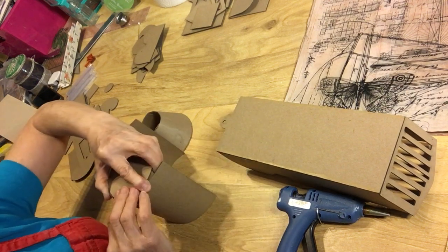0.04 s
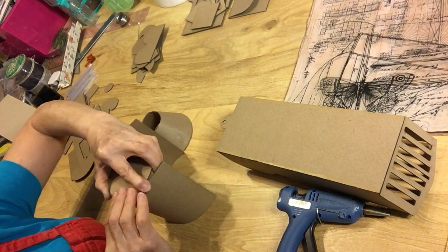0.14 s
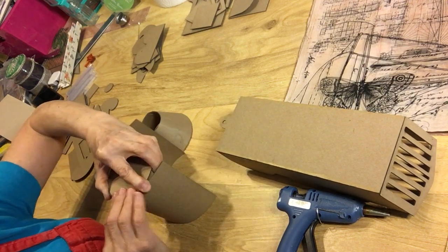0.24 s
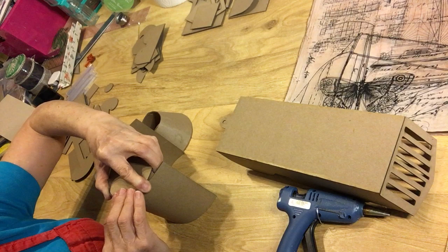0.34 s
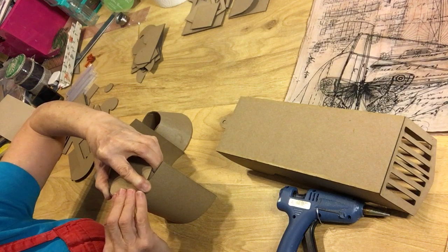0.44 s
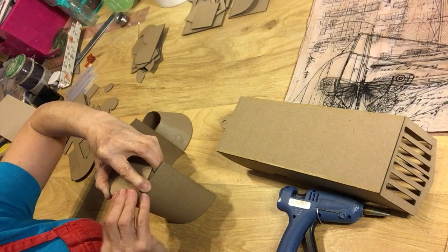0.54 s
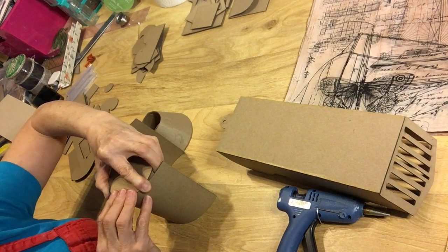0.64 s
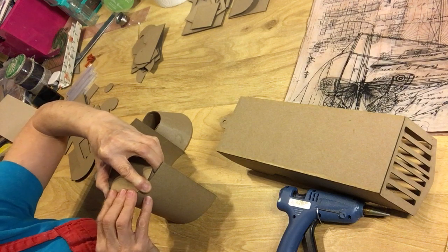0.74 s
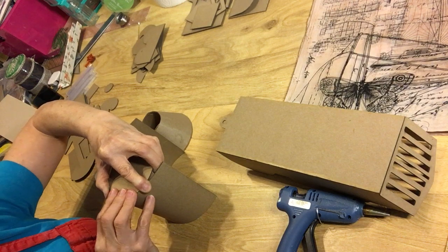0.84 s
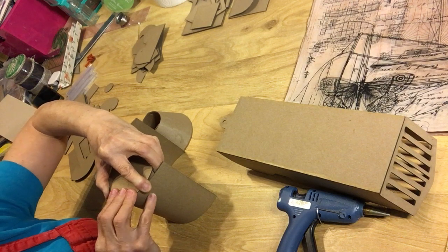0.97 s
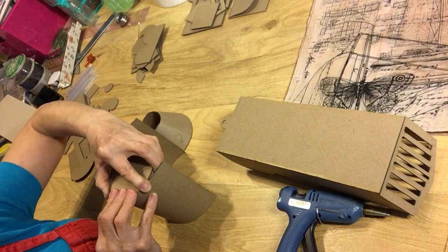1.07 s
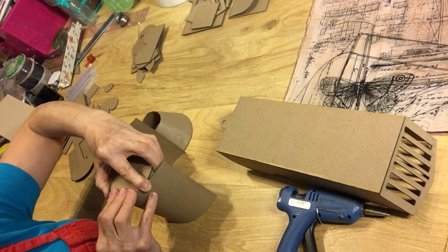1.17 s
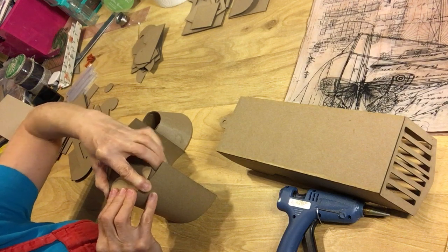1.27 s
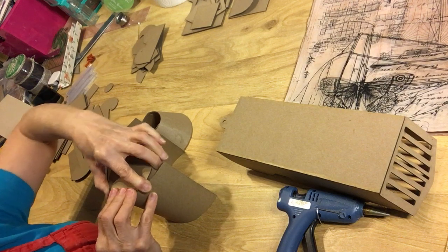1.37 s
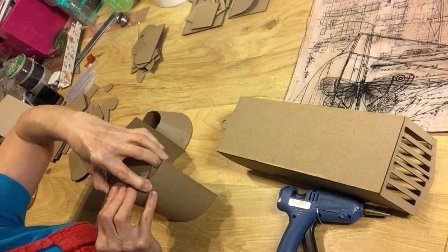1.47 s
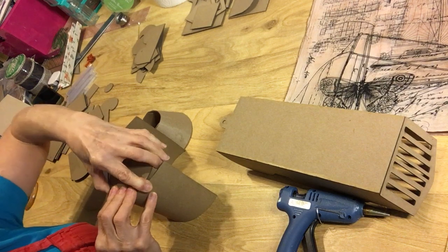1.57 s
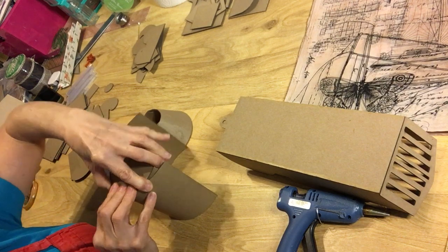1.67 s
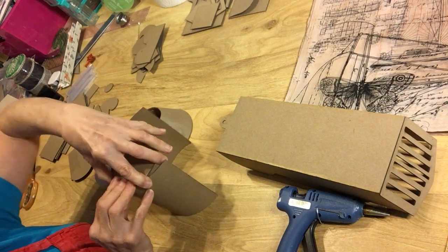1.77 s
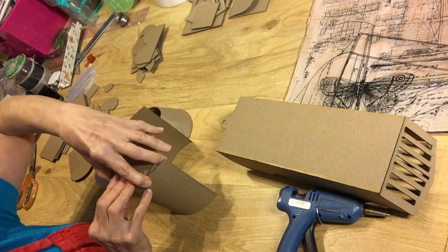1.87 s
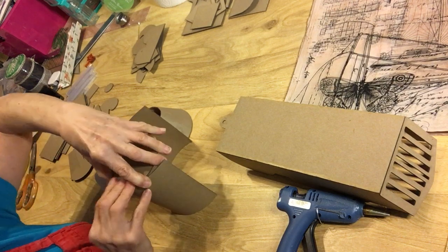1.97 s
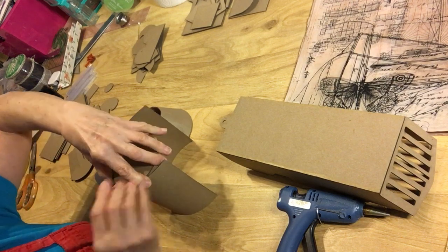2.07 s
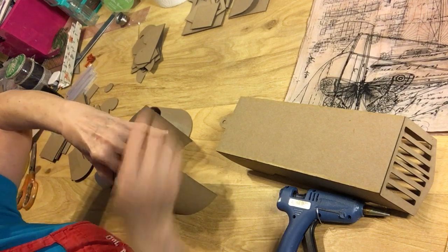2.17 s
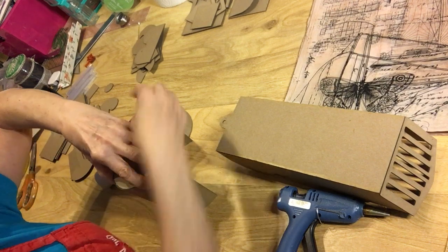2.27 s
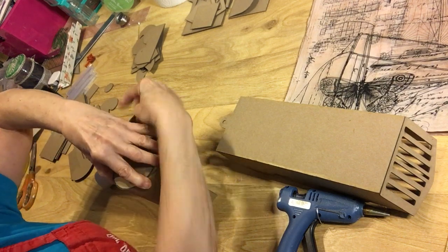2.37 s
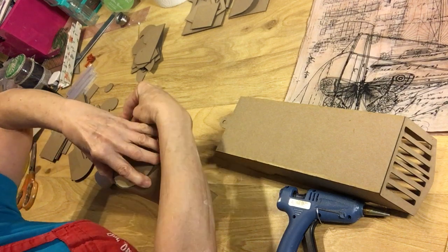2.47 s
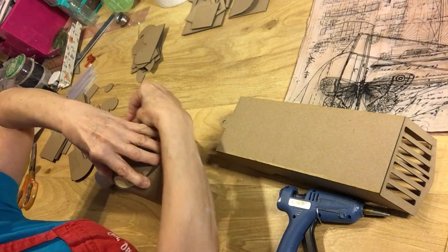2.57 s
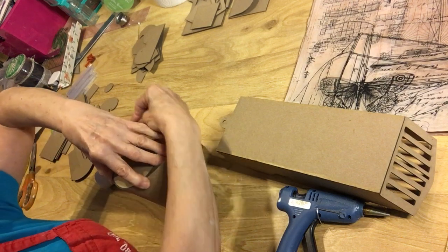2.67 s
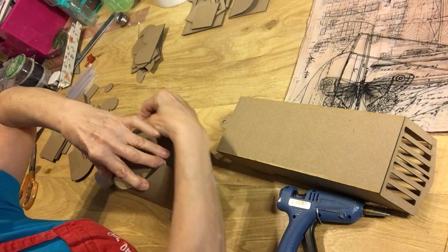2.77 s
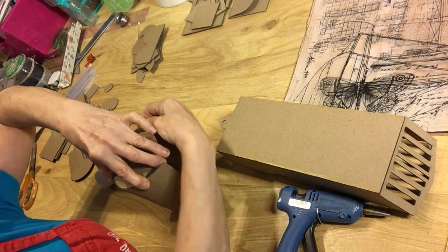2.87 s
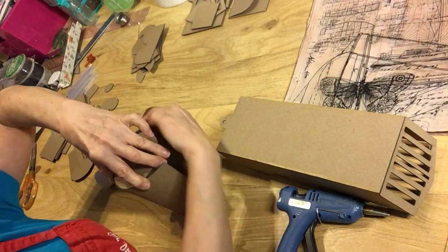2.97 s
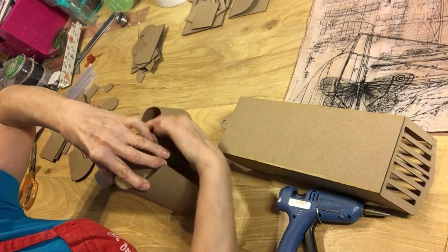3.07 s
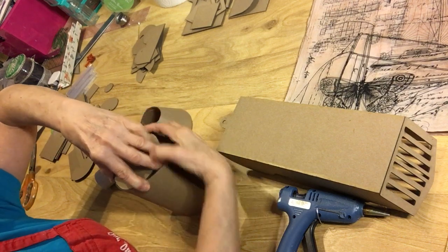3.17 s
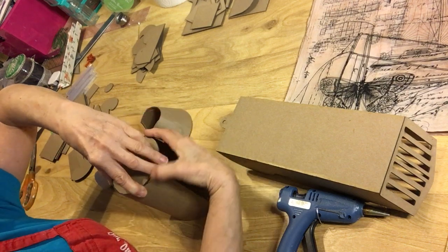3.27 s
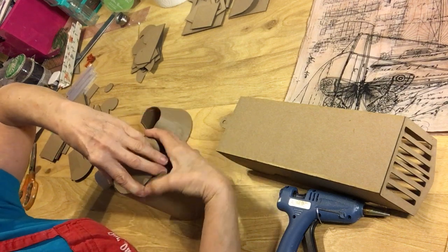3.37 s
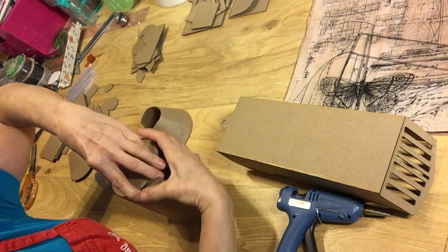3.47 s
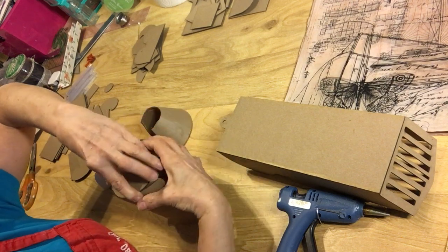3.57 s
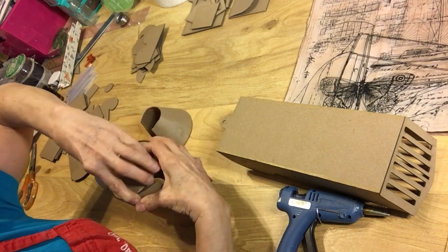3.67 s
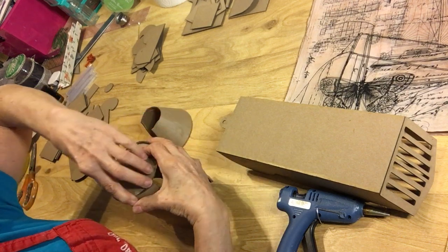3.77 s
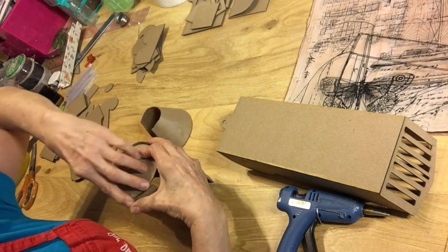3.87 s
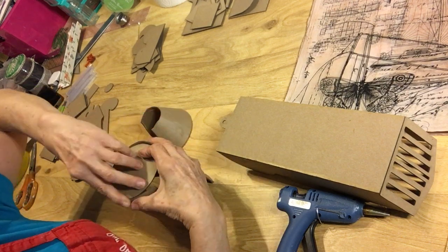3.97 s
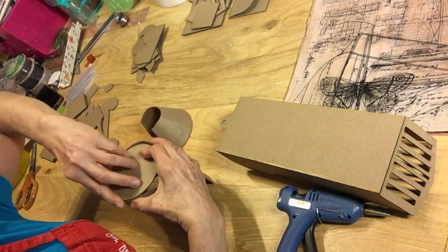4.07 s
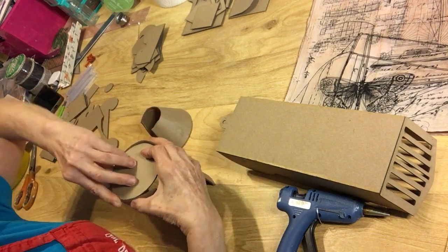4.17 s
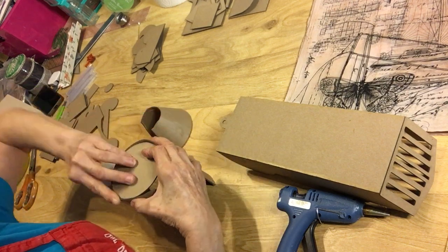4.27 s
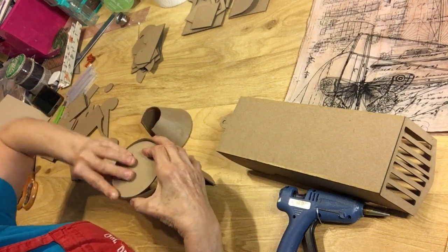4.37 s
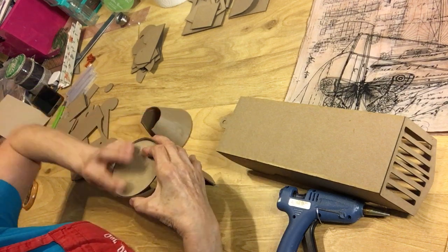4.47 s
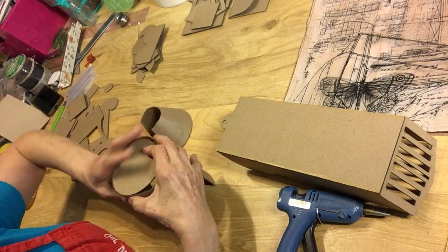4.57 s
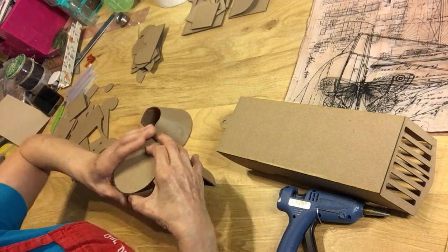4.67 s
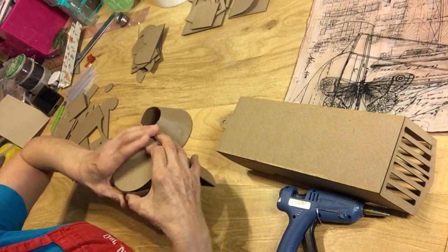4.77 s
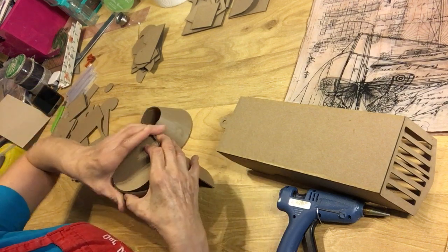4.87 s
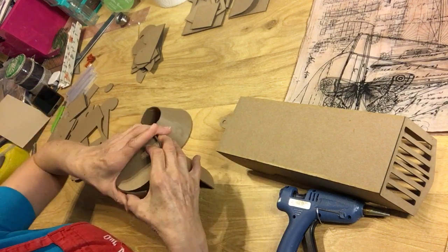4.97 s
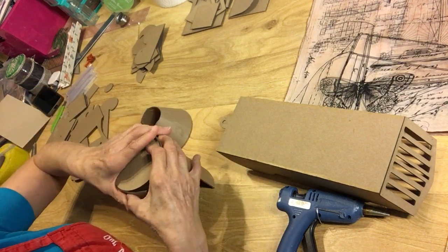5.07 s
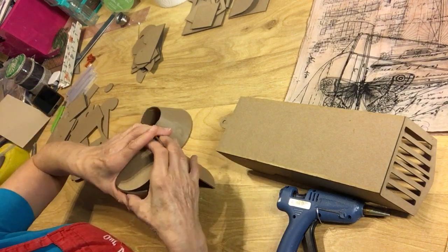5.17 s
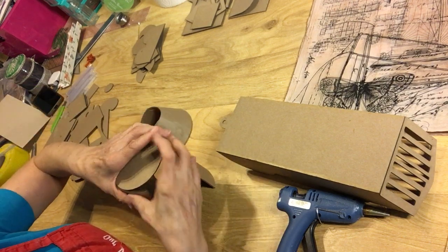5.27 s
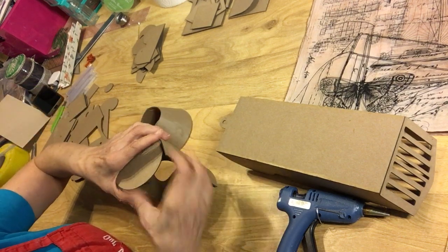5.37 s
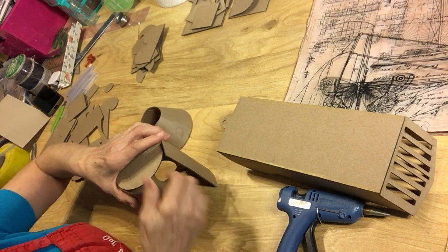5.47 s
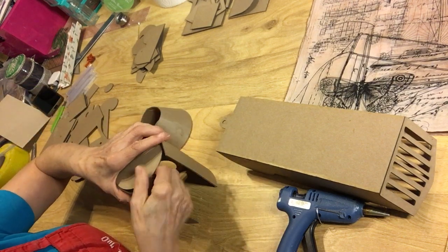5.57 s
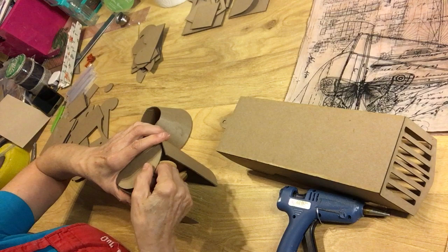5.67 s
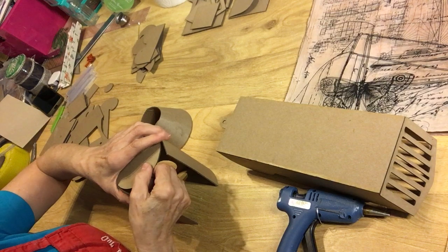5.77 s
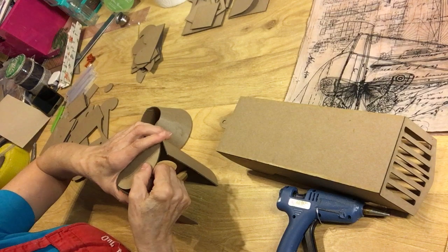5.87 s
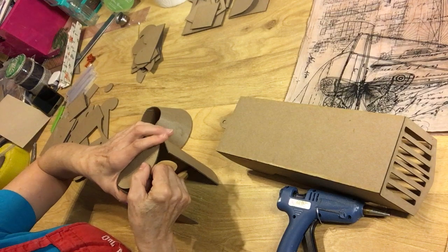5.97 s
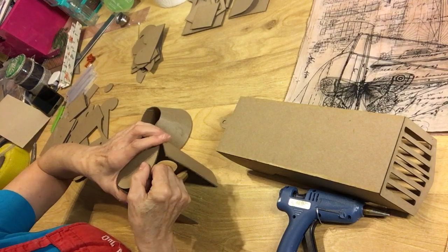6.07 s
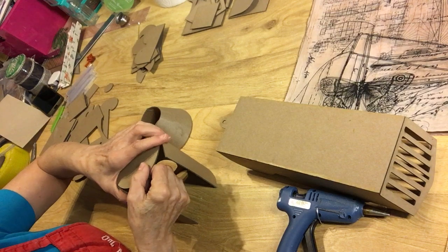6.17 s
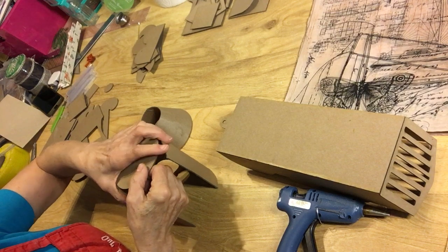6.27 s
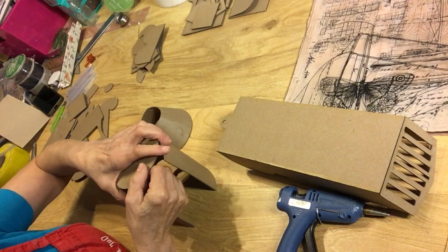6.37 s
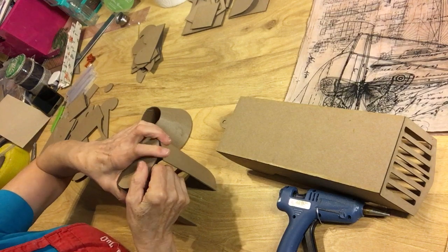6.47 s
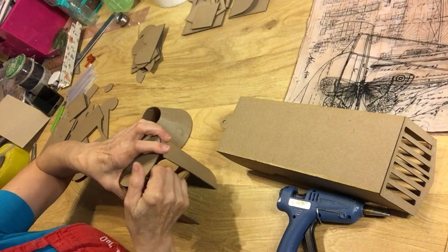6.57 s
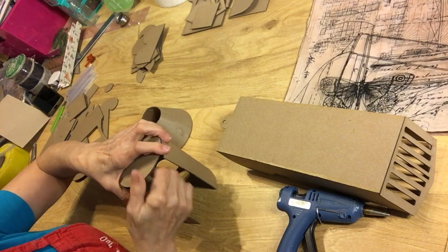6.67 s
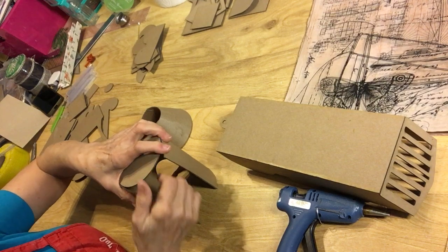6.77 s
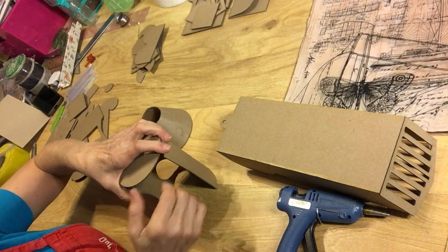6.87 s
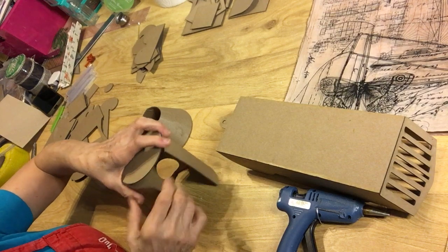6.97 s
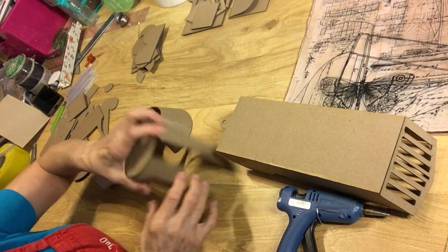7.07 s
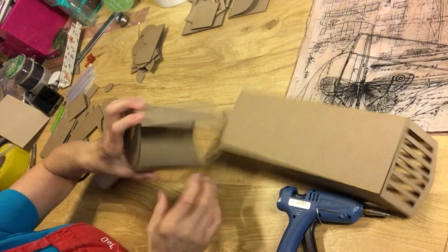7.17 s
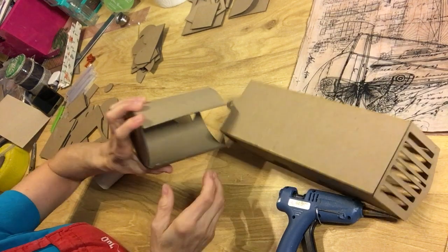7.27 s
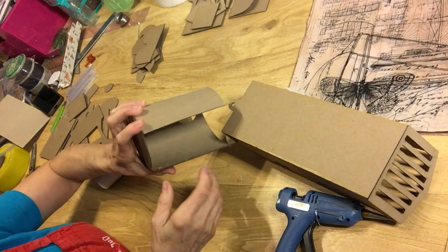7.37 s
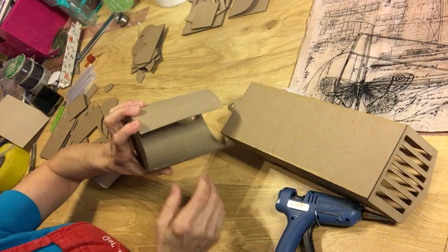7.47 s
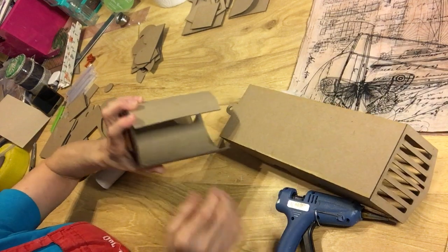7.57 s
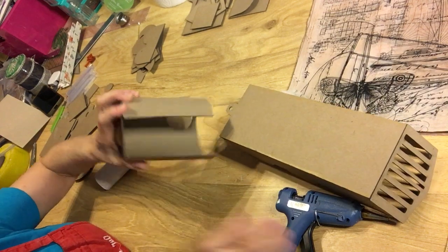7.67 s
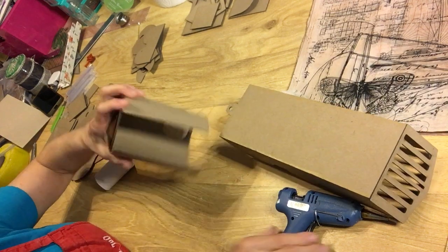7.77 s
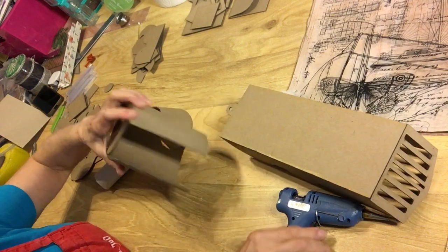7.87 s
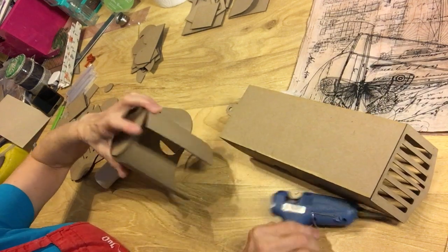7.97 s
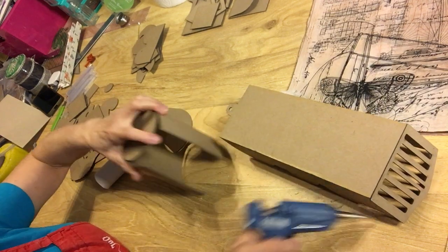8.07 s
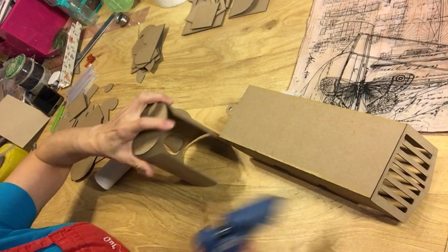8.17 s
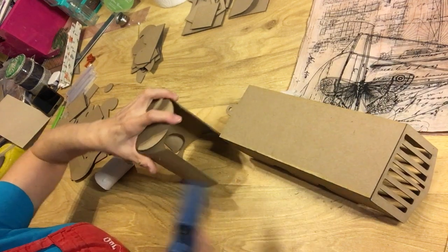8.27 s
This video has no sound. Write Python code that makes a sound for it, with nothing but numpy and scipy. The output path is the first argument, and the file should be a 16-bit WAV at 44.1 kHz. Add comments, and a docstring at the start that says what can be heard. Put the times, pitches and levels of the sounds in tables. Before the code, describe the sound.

Faint cardboard rustles, ticks and finger bumps in a small humming room, ending with louder knocks against a hollow box.

```python
"""Hands press a cardboard disc into a rolled cardboard tube on a wooden table.
Friction drives the tube's air, wall, cut edge and fibres; fingers bump it and its edges snap.
Card knocks on a long hollow box, mostly near the end as the piece is lifted, and the table rings.
A plastic glue gun clacks once. The room is small, with short echoes and a mains hum."""
import sys
import numpy as np
from scipy import signal
from scipy.fft import rfft, irfft, next_fast_len
from scipy.io import wavfile

SR = 44100
rng = np.random.default_rng(int(sys.argv[2]) if len(sys.argv) > 2 else 0)


def store_pcm(level_fs):
    """Save levels as 16-bit WAV."""
    pcm = np.round(np.clip(level_fs, -1, 1) * 32767).astype(np.int16)
    wavfile.write(sys.argv[1], SR, np.atleast_2d(pcm).T)


N = 367088
TIME_S = np.arange(N) / SR
AGE_S = TIME_S[:SR * 2 // 5]  # time within one event

# card on box and table: (time [s], level [dB], pitch [Hz], spread [oct], crack re body [dB])
KNOCKS = [(4.273, -34, 500, 2, -6.5), (7.2533, -29.5, 900, 1.6, -2.5), (7.257, -38, 607, 0.77, -22),
          (7.27, -34.5, 580, 2, -3.5), (7.3233, -30.5, 630, 1.2, -11), (7.399, -18, 830, 0.73, -6.5),
          (7.4087, -19.5, 1440, 0.52, -10.5), (7.4226, -26.5, 745, 0.26, -5.5),
          (7.438, -31, 615, 0.77, -19), (7.4741, -35.5, 1090, 0.75, -1.5), (7.565, -45.5, 850, 0.45, -15),
          (7.605, -44.5, 1000, .4, -17), (8.191, -22.5, 507, 0.63, -4), (8.1977, -32, 270, 0.88, -20)]


def from_db(db):
    """Decibels to gain."""
    return 10 ** (np.asarray(db) / 20)


def rms_one(x):
    """Scale to unit rms."""
    return x / np.sqrt(np.mean(x ** 2) + 1e-20)


def peak_one(x):
    """Scale to unit peak."""
    return x / (np.abs(x).max() + 1e-20)


def add(track, time_s, sound):
    """Mix a sound in at a given time."""
    start = max(round(time_s * SR), 0)
    track[start:start + len(sound)] += sound[:N - start]


def butterworth(x, hz, kind):
    """Gentle band or high pass."""
    return signal.sosfilt(signal.butter(2, hz, kind, fs=SR, output="sos"), x)


def at_hz(points, hz):
    """Read a table on a log-frequency axis."""
    points_hz, values = np.transpose(points)
    return np.interp(np.log(hz + 1), np.log(points_hz), values)


def coloured(x, spectrum, tilt_db_oct=0):
    """Give a noise a tilted spectrum; rms 1."""
    size = next_fast_len(len(x))
    hz = np.fft.rfftfreq(size, 1 / SR)
    gain = from_db(at_hz(spectrum, hz) + tilt_db_oct * np.log2(1 + hz / 1000))
    return rms_one(irfft(rfft(x, size) * gain, size)[:len(x)])


def drift(rate_hz):
    """Smooth random wander; rms 1."""
    hop, settle = 40, 2000
    pole = np.exp(-2 * np.pi * hop * rate_hz / SR)
    noise = rng.standard_normal(N // hop + settle + 2)
    slow = signal.lfilter([1], [1, -2 * pole, pole * pole], noise)[settle:]
    return np.interp(np.arange(N) / hop, np.arange(len(slow)), rms_one(slow))


def resonance(hz, width_hz):
    """Coefficients of a unit-gain resonator."""
    r = np.exp(-np.pi * width_hz / SR)
    return (1 - r * r) / 2 * np.array([1, 0, -1]), [1, -2 * r * np.cos(2 * np.pi * hz / SR), r * r]


def mode(hz, t60_s):
    """A struck mode dying away."""
    return np.sin(2 * np.pi * hz * AGE_S) * np.exp(-np.log(1000) * AGE_S / t60_s)


def onset(rise_s):
    """Exponential rise to 1."""
    return 1 - np.exp(-AGE_S / rise_s)


def struck(modes, tilt_db_oct=0):
    """All modes of an object set off together; peak 1."""
    return peak_one(sum((-1) ** k * from_db(db + tilt_db_oct * np.log2(hz / 1000)) * mode(hz, t60_s)
                        for k, (hz, db, t60_s) in enumerate(modes)))


def background(beat_hz, beat_depth, air_db):
    """Mains hum, beating slowly, over still room air."""
    # mains harmonics: (frequency [Hz], rms [dB])
    harmonics = [(120, -57), (240, -96), (360, -80)]
    # room air: (frequency [Hz], relative density [dB])
    air_spectrum = [(20, -52), (40, -11), (62, 2.5), (90, 1.5), (150, -0.5), (230, -7.5), (350, -7.5),
                    (480, -16), (1000, -18.5), (2500, -24.5), (5500, -28.5), (7500, -32), (12500, -31),
                    (16000, -44)]
    hum = sum(np.sqrt(2) * from_db(db) * np.sin(2 * np.pi * hz * TIME_S) for hz, db in harmonics)
    beat = 1 + beat_depth * np.cos(2 * np.pi * beat_hz * TIME_S)
    return hum * beat + from_db(air_db) * coloured(rng.standard_normal(N), air_spectrum)


def room_echo(build_s):
    """Dense reflections build up, then die band by band; energy 1."""
    # room decay: (frequency [Hz], t60 [s])
    decay = [(100, 0.51), (500, 0.16), (1500, 0.3), (4000, 0.3), (12000, 0.3)]
    edges_hz = np.geomspace(70, 18000, 9)
    tail = 0
    for low, high in zip(edges_hz, edges_hz[1:]):
        band = butterworth(rng.standard_normal(len(AGE_S)), [low, high], "band")
        tail += band * np.exp(-np.log(1000) * AGE_S / at_hz(decay, np.sqrt(low * high)))
    build = 1 - np.exp(-(AGE_S / build_s) ** 2)
    return rms_one(tail * build) / np.sqrt(len(AGE_S))


def table_ring(rise_s, thump_db):
    """Knocks pass into the table, which thumps and rings on."""
    # lasting ring of the box and things on the table: (frequency [Hz], level [dB], t60 [s])
    ring_modes = [(177, -16.5, 0.26), (245, -1, 0.26), (261, 1, 0.14), (350, -2, 0.33), (386, 0, 0.39),
                  (503, -12, 0.3), (600, 7, 0.17), (704, -2, 0.22), (768, 2, 0.25), (884, 9, 0.27),
                  (1006, 7, 0.26), (1127, 2, 0.32), (1346, 15, 0.14), (1470, 0, 0.13), (1610, -8, 0.16),
                  (1700, -1, .2), (1910, 2, 0.2), (2860, -6, 0.3)]
    # table top giving way: (frequency [Hz], level [dB], t60 [s])
    thump_modes = [(86.5, -2, .2), (136, 2, .12), (249, 6, .13)]
    ring = (struck(ring_modes) + from_db(thump_db) * struck(thump_modes)) * onset(rise_s)
    out = np.zeros(N)
    for time_s, level_db, *_ in KNOCKS:
        add(out, time_s, from_db(level_db) * ring)
    return out


def glue_gun_clack(time_s, level_db):
    """The glue gun's plastic shell touches the table as it is lifted."""
    # plastic shell: (frequency [Hz], level [dB], t60 [s])
    shell_modes = [(2080, -4, 0.029), (2820, 6.5, 0.023), (3070, 5, 0.018), (3240, -6, 0.023),
                   (4370, -5, 0.014), (5740, -6, 0.011)]
    out = np.zeros(N)
    add(out, time_s, from_db(level_db) * struck(shell_modes))
    return out


def crack(decay_s, tilt_db_oct, rise_s=0.0018):
    """Fibres give way in a short burst; peak 1."""
    # fibre crack: (frequency [Hz], relative density [dB])
    spectrum = [(80, -34), (300, 9.5), (700, -2), (1150, 9.5), (2100, 5), (3200, 4), (4500, 1), (6000, 0),
                (7500, -2), (10000, -4.5), (12000, -4), (16000, -31)]
    noise = coloured(rng.standard_normal(len(AGE_S)), spectrum, tilt_db_oct)
    return peak_one(noise * np.exp(-AGE_S / decay_s) * onset(rise_s))


def panels(pitch_hz, spread_oct):
    """A blow favours the panel modes near one pitch, depending on where it lands; peak 1."""
    # heavily damped box panels: (frequency [Hz], level [dB], t60 [s])
    box_modes = [(179, -7, 0.064), (248, -9.5, 0.055), (375, -6, 0.07), (447, -8, 0.044), (538, -5, 0.043),
                 (624, -1.5, 0.032), (716, 0, 0.026), (950, -5, 0.021), (1107.4, -6, 0.064),
                 (1250, -4, 0.018), (1516, -9.5, 0.019), (2050, -12.5, 0.026), (2680, -18, 0.017)]
    out = 0
    for k, (hz, db, t60_s) in enumerate(box_modes):
        weight = 1 / (1 + (np.log2(hz / pitch_hz) / spread_oct) ** 2)
        out += (-1) ** k * weight * from_db(db + rng.normal(0, 1.0)) * mode(hz, t60_s)
    return peak_one(out)


def box_knocks(contact_s):
    """The box answers each knock with a hollow thud and a dull crack."""
    out = np.zeros(N)
    for time_s, level_db, pitch_hz, spread_oct, crack_db in KNOCKS:
        body = panels(pitch_hz, spread_oct) * onset(contact_s)
        fibres = from_db(crack_db) * crack(decay_s=0.0038, tilt_db_oct=-9.5)
        add(out, time_s, from_db(level_db) * (body + fibres))
    return butterworth(out, 150, "high")  # small panels radiate no deep bass


def edge_snaps(fibre_db):
    """Card edges catch and flick free."""
    # snaps and ticks: (time [s], level [dB], tilt [dB/oct], crack decay [s])
    snaps = [(1.4255, -33.5, 0, .0017), (1.606, -48, -1.5, .002), (2.224, -56, 2, .003),
             (3.060, -41, -4.5, .005), (3.106, -48, 0, .004), (3.232, -51, -2, .003),
             (3.511, -51, -1, .003), (3.609, -45.5, -2, .005), (4.1955, -46, 5, .001),
             (5.2905, -41.5, 0, .003), (5.825, -51, -4, .003), (6.5205, -46, -2, .002),
             (6.569, -43, 0, .0025), (7.101, -40, -1, .003), (7.242, -44, 0, .007), (7.254, -41, 1, .003),
             (7.592, -52, 5, .002), (8.023, -44, 2, .003), (8.0855, -34, 2, .0028), (8.277, -46, 1.5, .002)]
    # flicked card edge: (frequency [Hz], level [dB], t60 [s])
    edge_modes = [(1117, 8, 0.025), (1404, 4, 0.0094), (1610, 1, 0.021), (2103, 7, 0.019), (3230, 2, 0.029),
                  (3790, 6, 0.011), (5030, 2.5, 0.0078), (5840, 8.5, 0.013), (9150, 1, 0.00237),
                  (11960, 13, 0.0021)]
    out = np.zeros(N)
    for time_s, level_db, tilt_db_oct, decay_s in snaps:
        fibres = from_db(fibre_db) * crack(decay_s, tilt_db_oct, rise_s=0.00024)
        add(out, time_s, from_db(level_db) * (struck(edge_modes, tilt_db_oct) + fibres))
    return out


def tube_bumps(rise_s, t60_s, overtone_db, scuff_db):
    """A soft contact sounds the tube's hollow note and overtone, a thud of card and a scuff of skin."""
    # fingers and disc on the tube: (time [s], level [dB], pitch [Hz], thud re note [dB])
    bumps = [(0.394, -53.5, 648, 1.5), (1.0, -61.5, 430, 4.5), (1.35, -54.5, 485, 7), (2.184, -58, 622, -6),
             (2.644, -41.5, 618, -6.5), (2.767, -48, 615, -22), (3.063, -34.5, 522, -4),
             (3.067, -39, 608, -11.5), (3.274, -47, 624, -21), (3.311, -49, 627, -19), (3.42, -48, 406, 2),
             (3.51, -48, 502, -20), (3.532, -41.5, 441, -3.5), (3.594, -51, 436, 2), (3.763, -46, 610, -23),
             (4.603, -50.5, 380, -6), (4.835, -53, 620, -12), (5.02, -56, 388, -0.5), (5.44, -60, 490, -5),
             (6.341, -55, 420, -4), (7.104, -45.5, 380, -1.5)]
    out = np.zeros(N)
    for time_s, level_db, hz, thud_db in bumps:
        overtone_hz = 2.07 * hz
        partials = mode(hz, t60_s) + from_db(overtone_db) * mode(overtone_hz, t60_s)
        note = peak_one(partials * onset(rise_s))
        thud = from_db(thud_db) * panels(overtone_hz, spread_oct=1.0)
        scuff = from_db(scuff_db) * crack(decay_s=0.0065, tilt_db_oct=-4.5)
        add(out, time_s, from_db(level_db) * (note + thud + scuff))
    return out


def swell(start_s, length_s, attack_s, release_s):
    """A movement gathers speed, holds it and dies away."""
    age_s = TIME_S - start_s
    return np.clip(age_s / attack_s, 0, 1) * np.exp(-np.clip((age_s - length_s) / release_s, 0, 20))


def edge_squeaks(width_hz, flutter_db):
    """A scraping edge sings in one narrow, fluttering resonance set by its free length."""
    # cut edge squeaks: (start [s], length [s], level [dB], pitch [Hz])
    squeaks = [(1.728, .15, -67.5, 3250), (2.61, 0.28, -72.5, 2330), (3.09, 0.069, -71, 2770),
               (3.226, 0.16, -73.5, 2850), (3.554, 0.069, -73, 2950), (3.603, 0.014, -72, 6100),
               (4.79, .23, -72.5, 4400), (5.809, 0.04, -67, 2880), (6.51, 0.079, -71, 2900)]
    noise = rng.standard_normal(N)
    out = np.zeros(N)
    for start_s, length_s, level_db, hz in squeaks:
        tone = rms_one(signal.lfilter(*resonance(hz, width_hz), noise))
        out += from_db(level_db) * swell(start_s, length_s, attack_s=0.0061, release_s=0.02) * tone
    return from_db(flutter_db * drift(rate_hz=20)) * out


def stroke_levels(rest_db, fidget_db):
    """Strokes add in power over fidgeting hands; dB of hollow, wall, edge and fibres."""
    # finger strokes: (start [s], length [s], level [dB], tilt [dB/oct], hollow boost [dB])
    strokes = [(0.0, 0.13, -82, -1, -3), (0.18, 0.052, -79.5, 2, -4), (0.548, 0.36, -80.5, 0.2, -3),
               (0.64, 0.046, -69, 0, -4), (0.98, 0.14, -80, 0.4, -4), (1.335, 0.018, -71, 1, 1),
               (1.472, 0.22, -69, -3.5, 3.5), (1.692, .21, -63.5, -1.5, 0), (2.075, 0.053, -70.5, 0, 2),
               (2.161, 0.035, -66, -2, 2.5), (2.509, 0.058, -66, -1, 3), (2.586, 0.3, -69.5, 0.5, 7),
               (2.935, .06, -77.5, 2, -2), (3.048, 0.1, -66.5, -0.3, 6), (3.212, 0.16, -72, 0.9, 9),
               (3.3, 0.046, -59, -2, 3), (3.388, 0.45, -69, -1.7, 5), (3.495, 0.22, -70, -0.4, -8),
               (3.83, 0.574, -72, -0.4, 4.5), (4.24, 0.13, -70.5, -1, 1.5), (4.418, 0.26, -75.5, 2.5, 5),
               (4.605, 0.068, -63.5, 1.5, -3), (4.662, 0.4, -72, 1.1, 1.5), (4.789, .06, -73, 2.5, 7.5),
               (4.923, 0.076, -75.5, 2.5, -1), (5.052, 0.088, -80, 2, 9), (5.266, 0.14, -73, 1.5, 5.5),
               (5.60, 0.28, -71, -0.6, 4), (6.02, 0.062, -67.5, -1, 2), (6.273, 0.13, -70.5, 0.5, -0.5),
               (6.465, 0.083, -71, -1, 8.5), (6.6, 0.064, -66.5, -0.05, 4.5), (6.91, 0.13, -80, -0.5, 9),
               (7.017, .12, -69.5, 2, 7), (7.231, 0.22, -63, 0.5, 12.5), (7.55, 0.098, -72.5, 0, 14),
               (7.88, 0.16, -73.5, -4, 1), (7.985, 0.051, -70.5, 1, 4.5), (8.165, 0.12, -69.5, 0, 10.5)]
    edge_oct, fibre_oct = 1.1, 3.34  # pitch above the wall
    power = np.ones((4, 1)) * from_db(rest_db + fidget_db * drift(rate_hz=4.9)) ** 2
    for start_s, length_s, level_db, tilt_db_oct, hollow_db in strokes:
        parts_db = level_db + np.array([hollow_db, 0, tilt_db_oct * edge_oct, tilt_db_oct * fibre_oct])
        speed = swell(start_s, length_s, attack_s=0.016 + 0.1 * length_s, release_s=0.032)
        power += from_db(parts_db)[:, None] ** 2 * speed ** 2
    return 10 * np.log10(power)


def friction(slips_per_s, spread_db, sliding_gain):
    """Tiny slips of uneven size over a smooth sliding noise."""
    sizes = from_db(spread_db * np.minimum(rng.exponential(1, N), 5))
    signs = rng.choice([-1, 1], N)
    slipping = rng.random(N) < slips_per_s / SR
    return rms_one(sizes * signs * slipping) + sliding_gain * rng.standard_normal(N)


def tube_hollow(drive, width_hz, block=256):
    """The tube's air resonates at a pitch set by how far the hands cover its mouth; rms 1."""
    # grip on the mouth: (time [s], hollow pitch [Hz])
    grip = [(0.0, 493), (0.23, 368), (0.35, 480), (1.27, 384), (1.32, 580), (2.48, 415), (2.59, 570),
            (4.03, 403), (5.93, 507), (5.95, 410), (7.0, 470), (7.65, 740), (7.78, 379), (8.32, 578)]
    pitch_hz = np.interp(TIME_S, *np.transpose(grip))
    air, state = np.zeros(N), np.zeros(2)
    for i in range(0, N, block):
        b, a = resonance(pitch_hz[i], width_hz)
        air[i:i + block], state = signal.lfilter(b, a, drive[i:i + block], zi=state)
    return rms_one(butterworth(air, [250, 950], "band"))


def resonate(drive, bands, wander_db):
    """Parallel resonances wax and wane as the contact point moves; rms 1."""
    out = 0
    for k, (hz, width_hz, db) in enumerate(bands):
        gain = from_db(db + wander_db * drift(rate_hz=29))
        out += (-1) ** k * gain * signal.lfilter(*resonance(hz, width_hz), drive)
    return rms_one(out)


def tube_rubbing():
    """Skin and card slide in jerks, driving the tube's hollow, wall, cut edge and surface fibres."""
    # card wall: (frequency [Hz], width [Hz], level [dB])
    wall_bands = [(882, 144, -4), (1119, 79, 2.5), (1174, 110, 3), (1364, 230, -6), (1658, 53, 0.5),
                  (1827, 140, -3.5)]
    # cut edge: (frequency [Hz], width [Hz], level [dB])
    edge_bands = [(2205, 460, -4), (2985, 350, 0.5), (3360, 1700, -8.5), (4360, 270, -4)]
    # surface fibres: (frequency [Hz], width [Hz], level [dB])
    fibre_bands = [(3630, 480, -5), (4470, 470, -3), (5090, 630, 0), (6160, 770, -2), (7100, 740, -5),
                   (8840, 860, -4.5), (11200, 1700, -4), (13000, 2600, -6.5)]
    hollow_db, wall_db, edge_db, fibre_db = stroke_levels(rest_db=-93, fidget_db=5)
    coarse = friction(slips_per_s=700, spread_db=3.0, sliding_gain=0.82)
    fine = friction(slips_per_s=2000, spread_db=-0.5, sliding_gain=1.0)
    air = from_db(hollow_db - 0.6) * tube_hollow(coarse, width_hz=580)
    wall = from_db(wall_db - 2.9) * resonate(coarse, wall_bands, wander_db=3.5)
    edge = from_db(edge_db - 3.0) * resonate(coarse, edge_bands, wander_db=1.0)
    squeak = edge_squeaks(width_hz=200, flutter_db=3.0)
    hiss = from_db(fibre_db - 2.0) * resonate(fine, fibre_bands, wander_db=2.4)
    return from_db(1.32 * drift(rate_hz=22)) * (air + wall + edge + squeak + hiss)


def scene():
    """Handling sounds, direct and through the room, over hum and air; mono."""
    rub = tube_rubbing()
    bump = from_db(-0.5) * tube_bumps(rise_s=0.005, t60_s=0.029, overtone_db=-14.5, scuff_db=-11)
    knock = from_db(2.0) * box_knocks(contact_s=0.00017)
    clack = glue_gun_clack(time_s=8.1918, level_db=-33)
    snap = from_db(-3.5) * edge_snaps(fibre_db=2.0)
    ring = from_db(-15.0) * table_ring(rise_s=0.0059, thump_db=-7.5)
    send = from_db(-9.5) * rub + from_db(-0.5) * bump + from_db(-5) * (knock + clack) + from_db(-6) * snap
    echo = signal.fftconvolve(send, room_echo(build_s=0.0033))[:N]
    room_tone = background(beat_hz=1.1, beat_depth=0.021, air_db=-65.5)
    return (rub + bump + knock + clack + ring + snap + echo + room_tone)[None]


def record(dry):
    """Steep low pass at 15.9 kHz."""
    return signal.sosfilt(signal.ellip(10, .1, 70, 15900, fs=SR, output="sos"), dry)


dry = scene()
out = record(dry)
store_pcm(out)
```